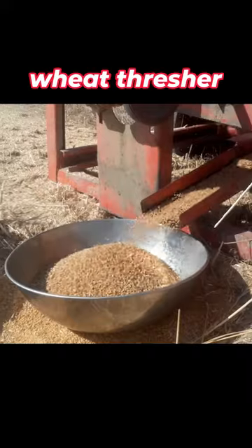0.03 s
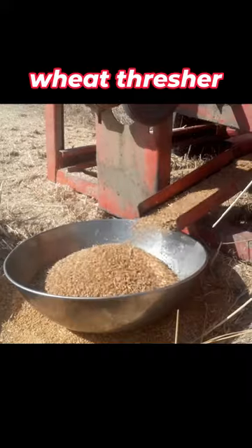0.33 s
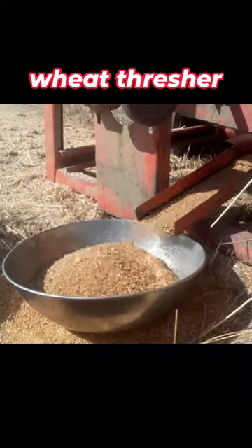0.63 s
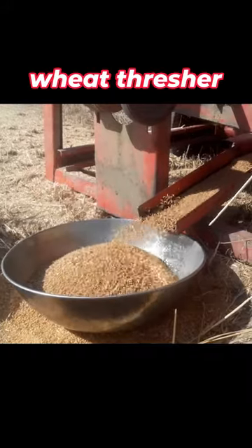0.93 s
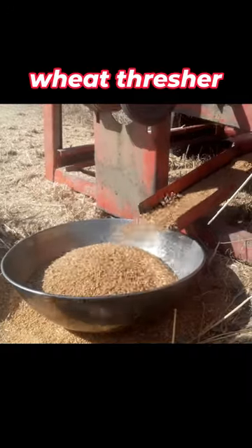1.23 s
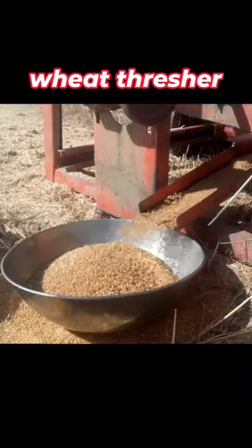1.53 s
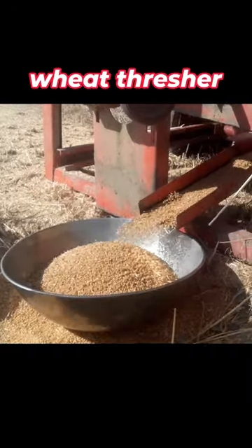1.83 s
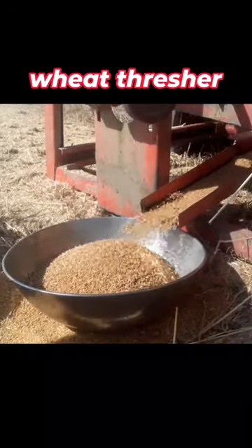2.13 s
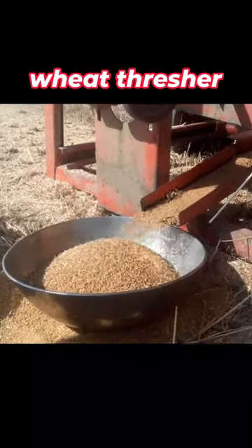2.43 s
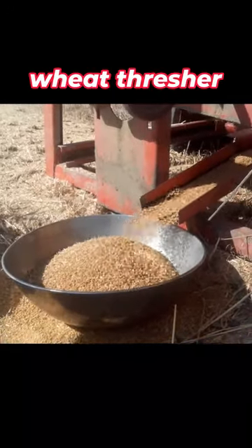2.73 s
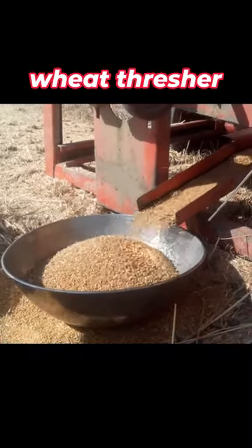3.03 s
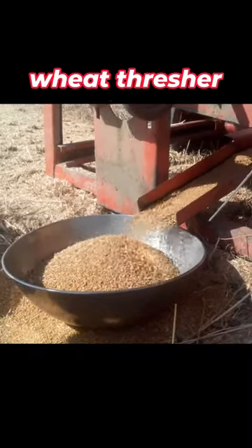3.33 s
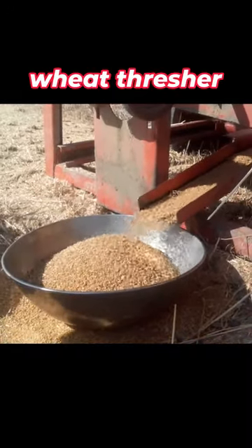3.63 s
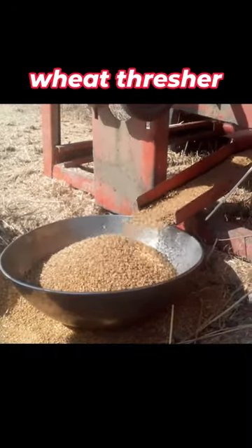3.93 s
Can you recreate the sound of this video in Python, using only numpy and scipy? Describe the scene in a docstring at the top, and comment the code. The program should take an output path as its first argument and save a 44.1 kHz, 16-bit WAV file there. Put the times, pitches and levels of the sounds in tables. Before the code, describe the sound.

A threshing machine roars and whines in the open air, fading in and speeding up slightly. Close to the microphone, wheat slides down its chute with a softer hiss, single kernels knocking and ticking into a steel bowl.

```python
"""A humming, roaring wheat thresher fades in from silence, heard outdoors beside its outlet.
Its drive slowly speeds up and shakes loose tones from the machine's parts. The spinning drum
howls and beats straw against a ringing steel casing. Grain hisses and knocks down a chute
into a metal bowl, where single kernels tick and ping."""
import sys
import numpy as np
from scipy import signal
from scipy.fft import rfft, irfft
from scipy.io import wavfile
from scipy.ndimage import uniform_filter1d

SR = 44100
rng = np.random.default_rng(int(sys.argv[2]) if len(sys.argv) > 2 else 0)


def generate_wav(signal):
    """Clip the signal to [-1, 1] and save it as 16-bit WAV at the path in sys.argv[1]."""
    frames = np.transpose(np.atleast_2d(signal))
    scaled = np.clip(frames, -1, 1) * 32767
    pcm = np.round(scaled).astype(np.int16)
    wavfile.write(sys.argv[1], SR, pcm)


N = 176400  # 4 seconds

# The tone of grain landing in the bowl. Each row: frequency in Hz, relative strength in dB.
BOWL_SPECTRUM = [(3000, -41), (6200, -11), (7500, -6.5), (8400, -2.5), (9900, -0.5), (11500, -3),
                 (13000, -3.5), (14500, -9), (16000, -14.5)]
BOWL_HITS_PER_S, BOWL_SPREAD_DB = 3500, 2.5


def undb(db):
    """Turn decibels into a number to multiply by."""
    return 10 ** (np.asarray(db) / 20)


def level(x, db):
    """Scale a sound to an average (rms) level in dB."""
    return x * undb(db) / np.sqrt(np.mean(x ** 2))


def walk(rate):
    """A smooth random wander of size about 1, with `rate` steps a second."""
    step = max(int(SR / rate), 2)
    path = np.interp(np.arange(N) / step, np.arange(N), rng.standard_normal(N))
    return level(uniform_filter1d(path, step // 2 + 1), 0)


def glide(t, start_db, end_db):
    """A level that moves evenly from start to end."""
    return start_db + (end_db - start_db) * t / t[-1]


def tone(hz):
    """A pure tone that follows a changing pitch."""
    return np.sin(2 * np.pi * (np.cumsum(hz) / SR + rng.random()))


def colour(x, spectrum):
    """Give x the tone of a struck object, drawn through (Hz, dB) points."""
    hz, db = np.array(spectrum, float).T
    freqs = np.maximum(np.fft.rfftfreq(N, 1 / SR), 1)
    gain = undb(np.interp(np.log(freqs), np.log(hz), db))
    cepstrum = irfft(np.log(gain), N)
    # Folding this onto its first half makes the ringing come after each hit.
    cepstrum[1:N // 2] *= 2
    cepstrum[N // 2 + 1:] = 0
    return irfft(rfft(x) * np.exp(rfft(cepstrum)), N)


def ring(x, hz, width_hz):
    """Let x ring around one pitch; a narrower band rings longer."""
    b, a = signal.iirpeak(min(hz, SR / 2 - 1), hz / (width_hz * np.sqrt(2)), fs=SR)
    return signal.lfilter(b, a, signal.lfilter(b, a, x))


def impacts(per_s, spread_db):
    """A shower of small hits at random times, each with its own strength."""
    hits = rng.random(N) < per_s / SR
    signs = np.sign(rng.standard_normal(N))
    return hits * signs * undb(spread_db * np.clip(rng.standard_normal(N), -3, 3))


def drive_hum(t, firing_hz):
    """The drive's firing makes low tones that rise with its speed."""
    # Each row: multiple of half the firing pitch, level in dB at the start, and at the end.
    harmonics = [(1, -80, -72), (2, -56.5, -51), (3, -53, -52), (4, -49, -64), (5, -52.5, -51.5),
                 (7, -46, -49)]
    hum = sum(tone(firing_hz * multiple / 2) * undb(glide(t, start_db, end_db) + walk(12))
              for multiple, start_db, end_db in harmonics)
    return np.sqrt(2) * hum


def parts_whine(t, waver=.00498, flutter_db=3):
    """Parts shaken by the drive each sing a wavering tone."""
    # Each row: pitch in Hz, level in dB at the start, and at the end.
    parts = [(260, -63, -52), (373.2, -50.5, -40), (440, -56, -52), (513, -44.5, -55), (546, -41, -50.5),
             (685.4, -51, -44), (755, -52, -40.5), (1136, -49, -47), (1315, -51, -53), (1595, -56, -58)]
    whine = np.zeros(N)
    for hz, start_db, end_db in parts:
        note = tone(hz * (1 + waver * walk(20)))
        whine += note * undb(glide(t, start_db, end_db) + flutter_db * walk(9))
    return whine


def drum(t, firing_hz, beats_per_firing=.245):
    """Beaters flail the straw; the blows roar in the casing and ring its steel panels."""
    # The casing's notes. Each row: pitch in Hz, width in Hz, level in dB.
    casing_notes = [(542.4, 45, -43.5), (807.4, 55, -34.5), (846, 48, -38), (971, 55, -38.5),
                    (1874, 170, -48), (2596, 45, -54.5)]
    # The roar of straw and air. Each row: frequency in Hz, relative strength in dB.
    roar_spectrum = [(25, -60), (60, -36), (85, -19), (115, -15.5), (170, -9), (290, -8), (380, -1),
                     (620, -2.5), (760, 1), (900, -6), (1100, -3.5), (1400, -5), (1650, -10.5), (2000, -13),
                     (2350, -20), (3000, -19.5), (6000, -33.5), (15000, -50)]
    throb = 1 + .073 * tone(firing_hz * beats_per_firing)
    blows = lambda: throb * impacts(per_s=7000, spread_db=3)
    panels = sum(level(ring(blows(), hz, width), db) for hz, width, db in casing_notes)
    roar = level(colour(blows(), roar_spectrum), db=-30)
    return roar * undb(glide(t, .66, -.5)) + panels  # the roar eases as the drum speeds up


def drum_howl(t, pitch_hz=843, sway_hz=10.83, sways_per_s=2.05, flutter_db=1.8):
    """The spinning drum sings one rough note whose pitch sways with the load."""
    rough_hz = pitch_hz * (1 + .0078 * walk(70))
    sway = sway_hz * np.cos(2 * np.pi * sways_per_s * (t - 1.42))
    return level(tone(rough_hz + sway) * undb(flutter_db * walk(60)), db=-33.5)


def grain_stream(per_s, spread_db, spectrum, db):
    """An uneven flow of kernels hits steel, each with a very short rattle."""
    age = np.arange(1024) / SR
    rattles = rng.standard_normal((8, len(age))) * np.exp(-age / .0019)
    kernels = sum(signal.fftconvolve(impacts(per_s / len(rattles), spread_db), rattle)[:N]
                  for rattle in rattles)
    # Even out the rattles' own tone, so that the steel sets the colour.
    rattle_power = np.mean(np.abs(rfft(rattles, N)) ** 2, axis=0)
    hiss = irfft(rfft(kernels) / np.sqrt(rattle_power), N)
    flow = undb(.5 * walk(16))
    return level(colour(hiss * flow, spectrum), db)


def chute_hiss():
    """Sliding grain makes thousands of tiny hits that blur into a hiss."""
    # The chute's tone. Each row: frequency in Hz, relative strength in dB.
    chute_spectrum = [(1000, -20), (2300, -0.5), (3000, -0.5), (4000, 0.5), (4500, -4), (5300, -10),
                      (6200, -20.5), (9000, -23), (16000, -27)]
    return grain_stream(per_s=4500, spread_db=2, spectrum=chute_spectrum, db=-41.5)


def spatter(t, decay_s=.009):
    """Little clumps of kernels bounce off the bowl's bare steel and skitter briefly."""
    landings = impacts(per_s=55, spread_db=1.5) ** 2
    energy = signal.fftconvolve(landings, np.exp(-2 * t / decay_s))[:N]
    skitter = np.sqrt(np.abs(energy)) * rng.standard_normal(N)
    return level(colour(skitter, BOWL_SPECTRUM), db=-55.5)


def bowl_pour(t):
    """Grain lands in the bowl with a bright hiss that swells when more arrives."""
    # How much grain arrives. Each row: time in seconds, change of level in dB.
    pour = [(.6, -2.5), (.87, 2), (1.05, -0.5), (1.3, .7), (1.85, -0.8), (2.15, 0.5), (2.4, -1.1), (3.2, 0),
            (4.0, -0.7)]
    hiss = grain_stream(BOWL_HITS_PER_S, BOWL_SPREAD_DB, BOWL_SPECTRUM, db=-48.5)
    return (hiss + spatter(t)) * undb(np.interp(t, *np.array(pour).T))


def steel_ring():
    """The stream of grain keeps the chute and bowl faintly ringing."""
    # Each row: pitch in Hz, width in Hz, level in dB.
    steel_notes = [(4140, 45, -62), (4360, 72, -59), (8600, 56, -69), (10900, 70, -67)]
    return sum(level(ring(impacts(BOWL_HITS_PER_S, BOWL_SPREAD_DB), hz, width), db)
               for hz, width, db in steel_notes)


def strike(t, start, db, hz, width_hz, decay_s):
    """One kernel sets off a cluster of close pitches that die away."""
    age = np.maximum(t - start, 0)
    ringing = level(ring(rng.standard_normal(N), hz, width_hz), db)
    return ringing * (t >= start) * np.exp(-age / decay_s)


def bowl_ticks(t):
    """Hard kernels hit the bowl with short, bright ticks."""
    # Each row: start in seconds, level in dB, centre pitch in Hz, width in Hz.
    ticks = [(.613, -46, 9800, 4000), (.828, -43, 11000, 4000), (.868, -48, 9900, 4000),
             (.936, -39.5, 9130, 1000), (1.218, -46, 11500, 4000), (1.259, -43, 9200, 1000),
             (1.352, -45, 8800, 1800), (1.727, -44, 9410, 900), (2.02, -45, 11300, 3000),
             (2.18, -45, 10500, 4000), (2.667, -47, 9700, 3000), (3.236, -43, 11400, 4000),
             (3.547, -42.5, 11200, 4000), (3.693, -45, 11500, 4000), (3.842, -44, 10000, 4500)]
    return sum(strike(t, start, db, hz, width, decay_s=.014) for start, db, hz, width in ticks)


def chute_knocks(t):
    """Single kernels hit the chute with a lower knock."""
    # Each row: start in seconds, level in dB.
    knocks = [(0.78, -38), (.836, -39), (1.038, -38), (1.221, -36), (2.661, -37.5), (2.815, -36),
              (2.906, -39), (2.965, -34), (3.424, -33.5), (3.572, -38), (3.87, -37.5)]
    return sum(strike(t, start, db, hz=3680, width_hz=1500, decay_s=.013) for start, db in knocks)


def bowl_pings(t):
    """A few kernels set the bowl ringing on one high note."""
    # Each row: start in seconds, level in dB.
    pings = [(.965, -55), (2.672, -45.5), (2.822, -42.5), (3.143, -44)]
    return sum(strike(t, start, db, hz=10860, width_hz=150, decay_s=.027) for start, db in pings)


def scene():
    """Drive, drum and grain sound together in the open air."""
    # The drive's speed. Each row: time in seconds, firing pitch in Hz.
    speed = [(.4, 96.3), (1.3, 97.8), (2.0, 99.8), (2.7, 102), (3.3, 103.3), (4.0, 104.6)]
    t = np.arange(N) / SR
    firing_hz = np.interp(t, *np.array(speed).T) * (1 + .004 * walk(10))
    machine = drive_hum(t, firing_hz) + parts_whine(t) + drum(t, firing_hz) + drum_howl(t)
    grain = chute_hiss() + bowl_pour(t) + steel_ring()
    kernels = bowl_ticks(t) + chute_knocks(t) + bowl_pings(t)
    return (machine + grain + kernels)[None]


def record(dry):
    """Fade in from silence, then cut away the very highest treble."""
    silence_s, fade_s, top_hz = .378, .27, 15750
    fade = np.clip((np.arange(N) / SR - silence_s) / fade_s, 0, 1)
    treble_cut = signal.ellip(12, .1, 80, top_hz, fs=SR, output="sos")
    return signal.sosfilt(treble_cut, dry * fade)


dry = scene()
out = record(dry)
generate_wav(out)
```